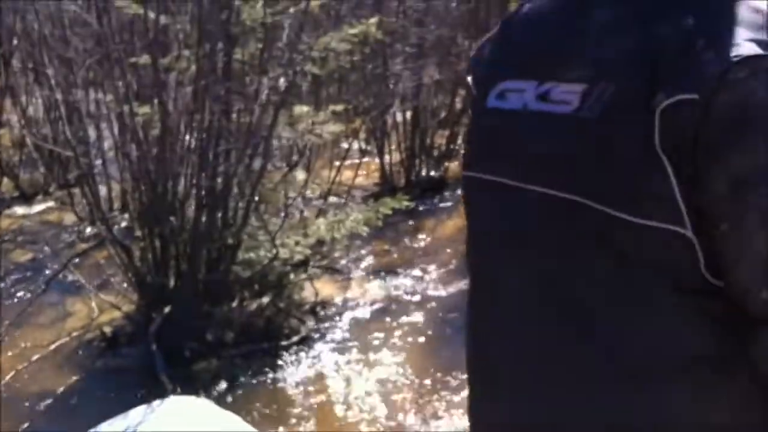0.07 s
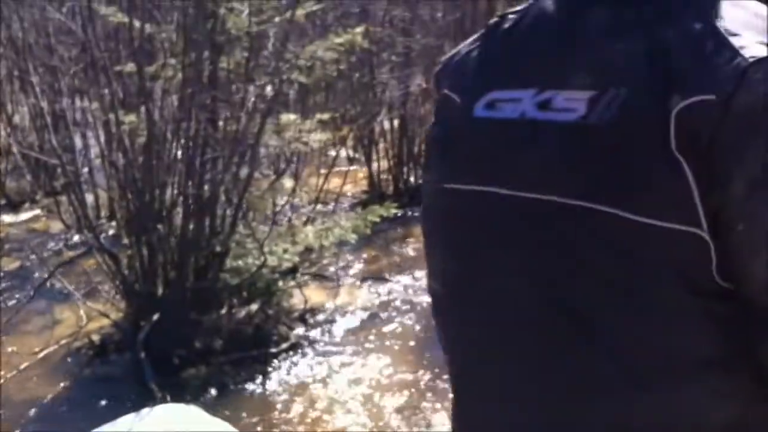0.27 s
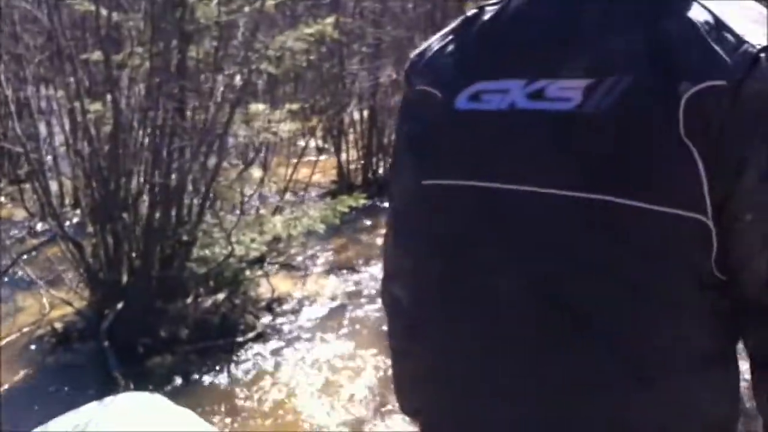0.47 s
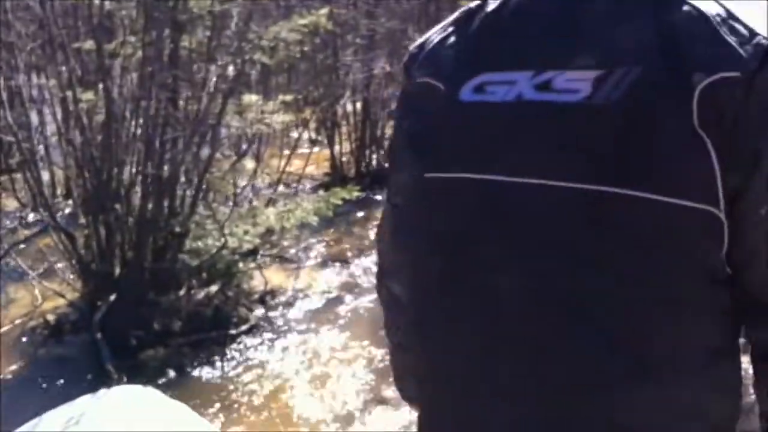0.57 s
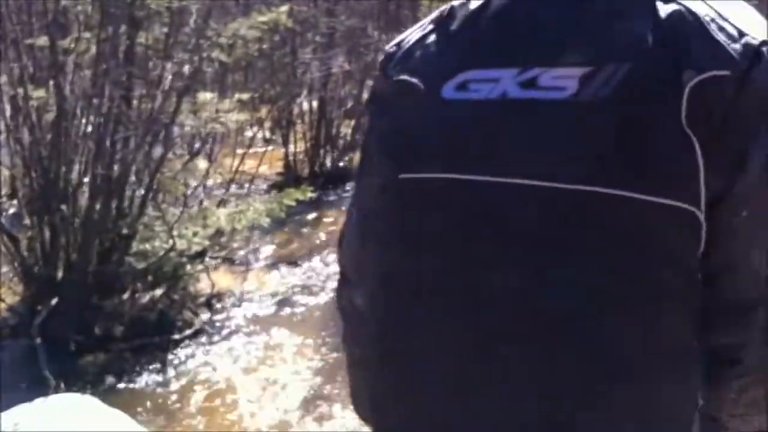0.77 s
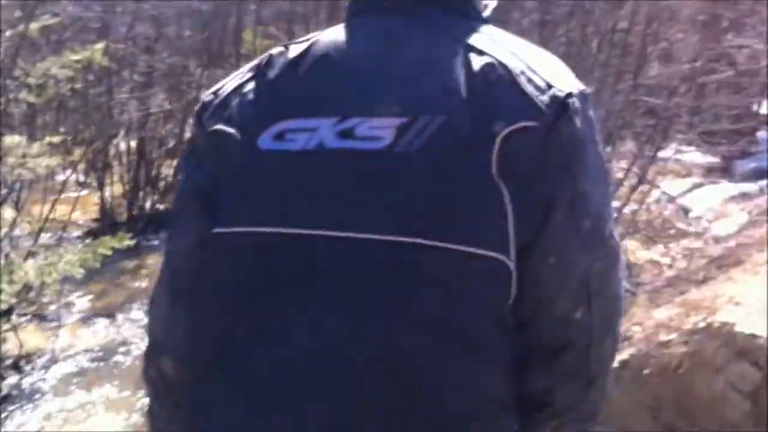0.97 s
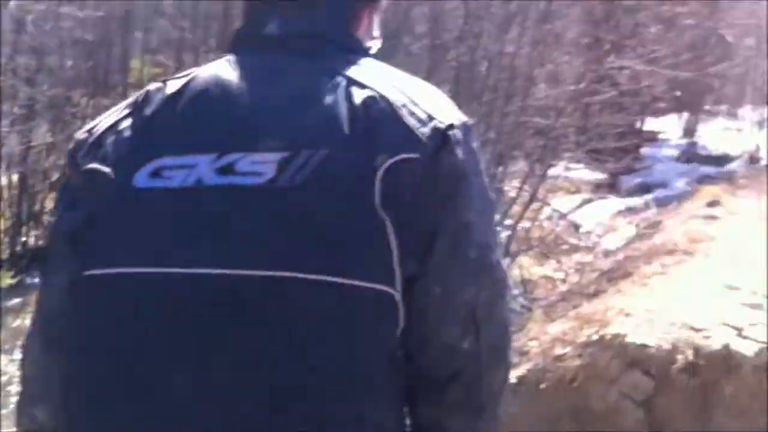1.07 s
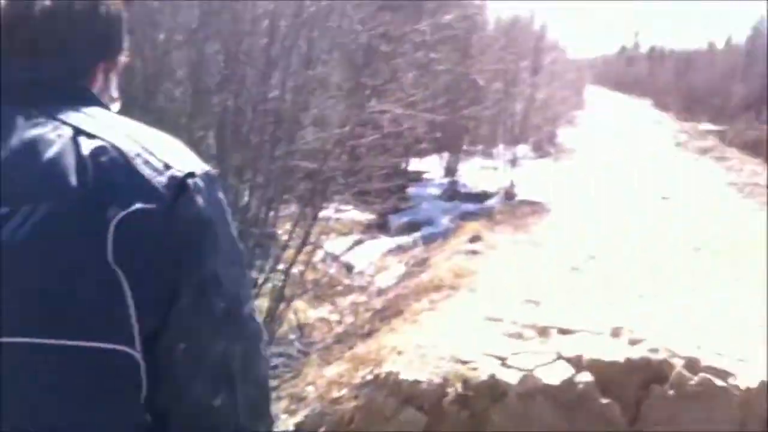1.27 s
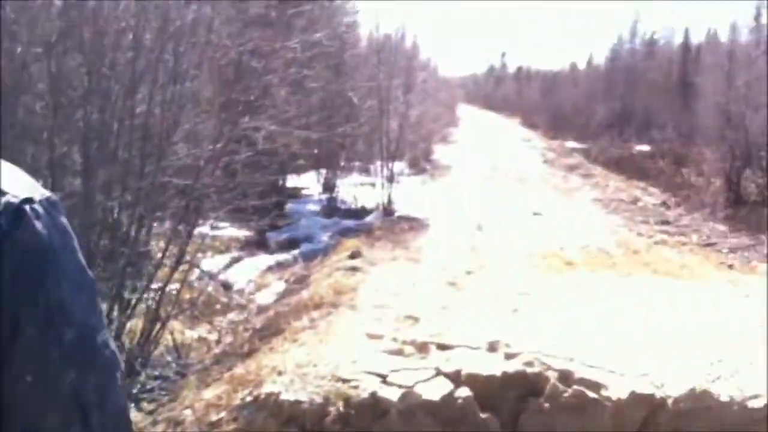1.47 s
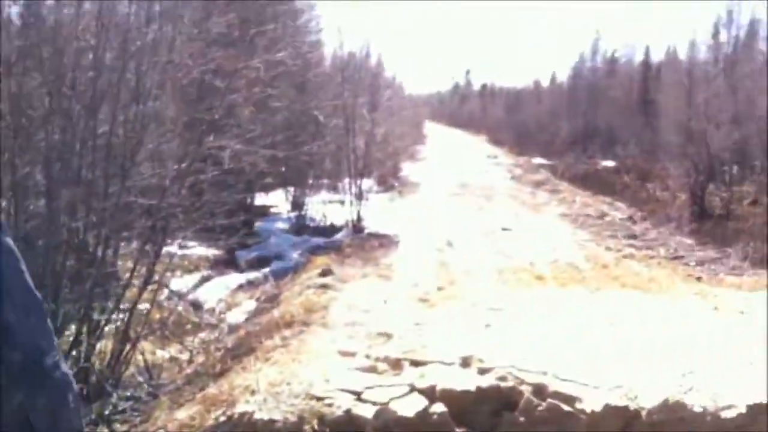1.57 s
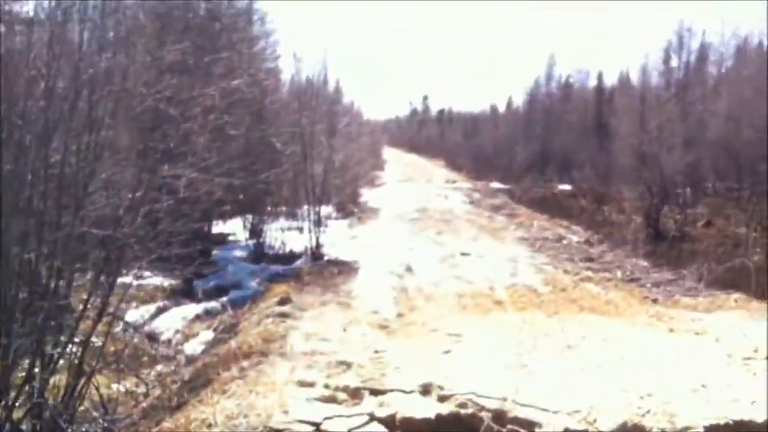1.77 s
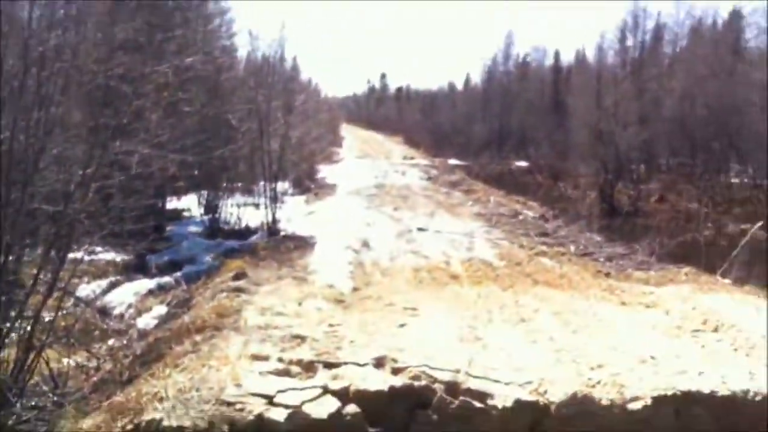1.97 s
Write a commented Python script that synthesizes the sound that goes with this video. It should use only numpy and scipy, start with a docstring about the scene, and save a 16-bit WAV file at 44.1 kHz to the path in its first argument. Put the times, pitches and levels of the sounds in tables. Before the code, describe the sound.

Meltwater runs softly and steadily through a culvert in the open, with tiny bubbles, hollow glugs, plops and small wave slaps mostly in the first second. Small dry clicks start near 0.8 s, with a loud one at 0.97. The water grows fainter and duller; more case clicks and low hand bumps come at 1.2 to 1.55 s, then a click at 1.9 and a brushing sleeve.

```python
"""Meltwater runs through and around a culvert on a bush road: a soft rush of patchy noise with swarms of small bubbles.
Hollow glugs, blips and plops are damped tones; slaps of small waves are noise bursts.
The hand-held camera turns away from the water, which dulls and lowers it. Its case clicks (struck resonances)
and bumps in the hand (low tones), and a sleeve brushes it at the end (hiss and rubs).
Loud peaks make the gain control duck for a moment."""
import sys
import numpy as np
from scipy import signal
from scipy.fft import rfft, irfft, next_fast_len
from scipy.io import wavfile
from scipy.ndimage import uniform_filter1d, map_coordinates

SR = 44100
rng = np.random.default_rng(int(sys.argv[2]) if len(sys.argv) > 2 else 0)


def unload_wav(signal):
    """Save mono or channel-first audio to the path in sys.argv[1] as 16-bit WAV at rate SR, clipped to [-1, 1]."""
    wavfile.write(
        sys.argv[1],
        SR,
        np.round(np.clip(np.atleast_2d(signal).T, -1, 1) * 32767).astype(np.int16),
    )


N = 89170


def amp(db):
    """Decibels to gain."""
    return 10 ** (np.asarray(db) / 20)


def unit(x):
    """Scale to rms 1."""
    return x / np.sqrt(np.mean(x ** 2) + 1e-20)


def decay(t, t60):
    """Exponential decay that falls 60 dB in t60."""
    return np.exp(-np.log(1000) * t / t60)


def curve(rows):
    """One value per sample from (start_s, value) rows."""
    return np.interp(np.arange(N) / SR, *np.transpose(rows))


def wobble(knots_per_s):
    """A smooth random curve through normal-distributed knots."""
    knots = rng.standard_normal(int(N * knots_per_s / SR) + 4)
    return map_coordinates(knots, [np.arange(N) * knots_per_s / SR])


def filtered(x, response):
    """Apply a gain given as a function of frequency in Hz."""
    size = next_fast_len(N + 8192)
    return irfft(rfft(x, size) * response(np.fft.rfftfreq(size, 1 / SR)), size)[:N]


def noise(spectrum, patchy_db):
    """Coloured noise of rms 1 with time-frequency patches of random gain."""
    grid = signal.stft(rng.standard_normal(N), nperseg=512)[2]
    patches = uniform_filter1d(rng.standard_normal(grid.shape), 5, 0)  # across frequency
    patches = uniform_filter1d(patches, 6, 1)  # across time
    x = signal.istft(grid * amp(patchy_db * unit(patches)), nperseg=512)[1][:N]
    hz, db = np.transpose(spectrum)
    return unit(filtered(x, lambda f: amp(np.interp(np.log(f + 1), np.log(hz), db))))


def add(track, start_s, sound):
    """Mix a sound into a track."""
    part = track[max(0, round(start_s * SR)):][:len(sound)]
    part += sound[:len(part)]


def damped_tones(rows, attack_s, cycles, rise_per_s):
    """Soft-start tones that fall 60 dB in a count of cycles; pitch climbs by the share rise_per_s each second."""
    out, t = np.zeros(N), np.arange(SR // 5) / SR
    for start_s, pitch_hz, level_db in rows:
        tone = np.sin(2 * np.pi * pitch_hz * t * (1 + rise_per_s * t / 2))
        envelope = (1 - np.exp(-t / attack_s)) * decay(t, cycles / pitch_hz)
        add(out, start_s, amp(level_db) * tone * envelope)
    return out


def minimum_phase(gain):
    """Causal impulse response with this gain on the FFT grid, by folding the cepstrum."""
    cepstrum = irfft(np.log(np.maximum(gain, 1e-6)))
    half = len(cepstrum) // 2
    fold = np.r_[1, np.full(half - 1, 2), 1, np.zeros(half - 1)]
    return irfft(np.exp(rfft(cepstrum * fold)))


def bumps():
    """Soft bumps of the hand: low, heavily damped tones of fixed pitch."""
    # start_s, pitch_hz, level_db
    hand_bumps = [(.482, 92, -62), (.972, 89.5, -55.5), (1.324, 91, -50), (1.343, 181, -33.5),
                  (1.454, 144, -44), (1.470, 112, -52)]
    return damped_tones(hand_bumps, attack_s=0.0045, cycles=5.7, rise_per_s=0)


def sleeve():
    """Cloth slides over the case with an uneven hiss and a few low rubs that rise in pitch."""
    # hiss level: start_s, level_db
    brush_level = [(1.88, -97), (1.915, -65), (1.955, -54), (1.995, -48.5), (2.02, -47.5)]
    # hiss colour: freq_hz, density_db (per Hz)
    cloth_colour = [(100, -49), (1000, -9.5), (1800, -9), (2400, -9), (4200, -9), (4850, 6), (5350, 4.5),
                    (6200, -7), (8200, -4.5), (10000, -9.5), (12500, -7), (16000, -24)]
    # low rubs: start_s, pitch_hz, level_db
    rubs = [(1.946, 165, -42.5), (1.972, 273, -40)]
    hiss_db = curve(brush_level) + 1.6 * wobble(110)
    hiss = amp(hiss_db) * noise(cloth_colour, patchy_db=3.0)
    return hiss + damped_tones(rubs, attack_s=0.02, cycles=29, rise_per_s=10.8)


def clicks():
    """Each click strikes the case resonances in its own balance and tuning, with rebound, crack and rattle."""
    # resonances of the camera case: freq_hz, half_width_hz, level_db
    case_modes = [(1360, 148, -4), (1676, 127, -4), (3708, 320, 1), (4670, 270, -5), (5310, 410, 0),
                  (6060, 300, 1), (6730, 240, -1.5), (8250, 480, -1.5), (9430, 550, -1), (11170, 560, 2),
                  (12260, 530, -6), (13730, 460, -2), (16450, 590, 2)]
    # centres of the strike bands: freq_hz
    band_hz = [550, 1290, 1620, 2150, 3650, 5150, 6300, 9000, 11500, 14500]
    # clicks: start_s, tuning_ratio, rebound_db, level_db, rattle_db, then strike_db for each band
    strikes = [(.8020, 0.83, -30, -25.5, -6, -6, -6, -8, -7, 1, -4, 1, 2, -15, -13),
               (.8153, 1.15, -30, -15.5, -5, -14, -14, -16, -18, -13, -12, -7, -1.5, -2, -18),
               (.8276, 1.07, -30, -14.5, -16, -16, -21, -14, -10, -24, -30, -5, -1, 1.5, -25),
               (0.8379, 1.1, -30, -15.5, -15, -2, -5, -13, -8, -6, -14, -2, 0, 0, -2),
               (.9452, 1.23, -30, -16.5, -12, -20, -15, -13, -1, -1, -12, -3, -7, -28, -31),
               (0.9538, 1.4, -30, -9, -26, -19, -15, -12, -17, -38, -43, -8, -5.5, 5, 7),
               (0.9657, 1.36, -30, -10, -22, -12, -10, -16, -30, -45, -24, 10, -18, -19, -13),
               (0.9725, 0.96, -46, 13.5, -10.5, 4, -10, -1, -3.5, -5.5, -18, -1, -19.5, -7.5, -3),
               (1.2120, 0.96, -30, -17, -3, -28, -28, -21, -26, -35, -35, -37, -10.5, 2.5, -2),
               (1.2308, 1.015, -36, 3.5, -41, -10, -9, -6.5, -4.5, 3.5, -21, -9.5, -0.5, -2, -16),
               (1.3362, .99, -34, -3, -26, -5, -3, 3, -5, -18, -9, -21, -13, -14, -18),
               (1.345, 0.97, -30, -17, -18, -19, -24, -15, -14.5, -25, -24, -10, -13, 3, -1),
               (1.4505, 0.95, -42, 9, -19, 6, -0.5, 0.5, -5, -20, -13.5, -24.5, -24, -35, -31),
               (1.5305, 0.966, -31, -9, -13.5, -14, -18, -9, -25, -13, -2, -10, -4.5, -13, -5),
               (1.8994, 0.95, -2.5, -2.5, -26, 8, -13, -11, 4, -21, -1.5, 1.5, -8, 1.5, -8),
               (1.9192, 1.4, -30, -20, -8, -23.5, -20, -20, -22, -20, -17, -15, -13, 5, -12),
               (1.934, 1.02, -29.5, -18, 1, -15, -6, 2.5, 15, -10, -16, -14, -14, -14, -14)]
    crack_db, crack_t60_s, rattle_t60_s = -6.5, 0.013, 0.078
    low_cut_hz, rebound_s = 1096, 0.0007
    out, t = np.zeros(N), np.arange(4096) / SR
    f = np.fft.rfftfreq(len(t), 1 / SR)
    low_cut = 1 / (1 + (low_cut_hz / (f + low_cut_hz / 20)) ** 6)
    for start_s, tuning, rebound_db, level_db, rattle_db, *strike_db in strikes:
        body = sum(amp(db) / (1 + ((f - tuning * hz) / width_hz) ** 2) for hz, width_hz, db in case_modes)
        ring = minimum_phase(body * low_cut * amp(np.interp(f, band_hz, strike_db)))
        rebound = np.pad(ring, (round(rebound_s * SR), 0))[:len(t)]
        ring = ring - amp(rebound_db) * rebound
        crack = rng.standard_normal(len(t)) * decay(t, crack_t60_s)
        rattle = rng.standard_normal(len(t)) * decay(t, rattle_t60_s)
        scatter = amp(crack_db) * crack / np.linalg.norm(crack)
        scatter = scatter + amp(rattle_db) * rattle / np.linalg.norm(rattle)
        scattered = signal.fftconvolve(ring, scatter)[:len(t)]
        add(out, start_s, amp(level_db) * (ring + scattered))
    return out


def slaps():
    """Small waves break in short bursts of coloured noise."""
    # bursts, before a gain of 2: start_s, level_db, t60_s
    bursts = [(0.086, -57, 0.045), (0.133, -55, 0.038), (.425, -48.5, 0.033), (0.555, -57, 0.045),
              (0.665, -50, 0.064), (0.773, -54, 0.011)]
    # freq_hz, density_db (per Hz)
    slap_colour = [(40, -52), (100, -42), (300, 0), (800, -3), (1500, -26), (2600, -9), (6000, -9),
                   (15000, -13)]
    rise_share = 0.069  # rise time constant as a share of t60
    level, t = np.zeros(N), np.arange(SR // 5) / SR
    for start_s, level_db, t60_s in bursts:
        rise = 1 - np.exp(-t / (rise_share * t60_s))
        add(level, start_s, 2 * amp(level_db) * rise * decay(t, t60_s))
    return level * noise(slap_colour, patchy_db=4)


def plops():
    """Drops plop into the pool: quickly damped tones."""
    # start_s, pitch_hz, level_db
    drops = [(.427, 317, -37.5), (.557, 640, -36), (.7725, 403, -35), (.7885, 370, -37.5),
             (.8045, 310, -38.5), (.860, 564, -34)]
    return damped_tones(drops, attack_s=0.0014, cycles=5.6, rise_per_s=1.8)


def blips():
    """Small bubbles burst near the bank: high tones that rise as they ring."""
    # start_s, pitch_hz, level_db
    bursting_bubbles = [(.086, 1720, -48.5), (.089, 2400, -42), (.123, 1800, -55), (.137, 2170, -39),
                        (.181, 3630, -43.5), (.376, 1660, -45.5), (.388, 1635, -45), (.407, 2350, -44),
                        (.424, 1460, -49.5), (.427, 2050, -45.5), (.450, 1430, -45), (.654, 2170, -46.5),
                        (.668, 3760, -39.5), (.751, 1960, -46.5), (.7725, 1446, -43), (.788, 1620, -47.5),
                        (.870, 2080, -49), (.898, 1310, -56), (.946, 1850, -41), (.955, 1700, -40)]
    return damped_tones(bursting_bubbles, attack_s=0.001, cycles=42.4, rise_per_s=6.3)


def glugs():
    """Glugs and large bubbles at the pipe: hollow tones that rise slightly."""
    # start_s, pitch_hz, level_db
    pipe_glugs = [(.272, 787, -43.5), (.341, 378, -40.5), (.352, 328, -41.5), (.424, 382, -44.5),
                  (.428, 259, -48), (.498, 805, -47.5), (.552, 700, -40), (.556, 867, -41.5),
                  (.562, 1120, -40), (.634, 1180, -51), (.660, 890, -41), (.672, 780, -49),
                  (.948, 850, -46), (.999, 313, -41), (1.142, 276, -47.5)]
    return damped_tones(pipe_glugs, attack_s=0.0015, cycles=27, rise_per_s=1.8)


def bubbles(per_s, centre_hz, spread, cycles, size_db):
    """A swarm of damped, slightly rising tones, scaled to rms 1."""
    count = int(per_s * N / SR)
    when, pitch, size = rng.random((count, 3)).T
    log_ratio = spread * np.log(pitch / (1 - pitch)) / 2  # logistic scatter of pitch
    hz = np.clip(centre_hz * np.exp(log_ratio), 220, 15000)[:, None]
    age = np.arange(SR // 25) / SR * hz / cycles  # 1 when 60 dB down
    tone = np.sin(2 * np.pi * cycles * age * (1 + 0.093 * np.minimum(age, 1)))
    tone = tone * decay(age, 1) * (1 - np.exp(-2 * cycles * age))
    tone = tone * amp(-size_db * np.log(1 - .98 * size))[:, None]  # few large, many small
    at = (when * N).astype(int)[:, None] + np.arange(tone.shape[1])
    return unit(np.bincount(at.ravel(), tone.ravel(), N)[:N])


def stream():
    """Rush, bubbles and spray share one level; treble loses more as the camera turns away."""
    # stream level: start_s, level_db
    flow_level = [(0, -54.5), (.45, -55.5), (.85, -55), (1.05, -57.5), (1.4, -58), (1.7, -58.5),
                  (2.02, -56)]
    # rush of the water: freq_hz, density_db (per Hz)
    rush_colour = [(25, -43), (70, -21.5), (140, -11), (215, -4.5), (280, 0), (380, 1), (520, -6), (850, 0),
                   (1250, -5.5), (1750, -4), (2600, -9), (5000, -12), (9000, -15), (15500, -16.5)]
    bubble_db, spray_db = -8.5, -10.5  # relative to the rush
    treble_loss_db_per_db = 0.5  # extra loss per dB below the highest level
    flow_db = curve(flow_level)
    water = noise(rush_colour, patchy_db=2.25) * amp(0.86 * wobble(21.44))
    water = water + amp(bubble_db) * bubbles(260, centre_hz=1209, spread=0.471, cycles=30.6, size_db=2.0)
    water = water + amp(spray_db) * bubbles(900, centre_hz=4720, spread=0.68, cycles=2.5, size_db=9.5)
    treble = filtered(water, lambda hz: hz ** 2 / (hz ** 2 + 2200 ** 2))
    treble_gain = amp(treble_loss_db_per_db * (flow_db - flow_db.max()))
    return amp(flow_db) * (water - treble + treble * treble_gain)


def scene():
    """Water and pipe, with the handling of the camera close by."""
    water = stream() + glugs() + blips() + plops() + slaps()
    handling = clicks() + bumps() + sleeve()
    return (water + handling)[None]


def record(dry):
    """Gain control ducks just after a loud peak and recovers steadily; a steep low-pass limits the band."""
    limit_db, duck_db_per_db, attack_s, recover_db_per_s = -14, 0.35, 0.024, 64
    top_hz = 16000
    x = dry[0]
    recovery_db = recover_db_per_s * np.arange(N) / SR
    over_db = np.maximum(20 * np.log10(np.abs(x) + 1e-9) - limit_db, 0)
    held_db = np.maximum.accumulate(over_db + recovery_db) - recovery_db  # peak hold, linear fall
    pole = np.exp(-1 / (attack_s * SR))
    duck_db = duck_db_per_db * signal.lfilter([1 - pole], [1, -pole], held_db)
    return filtered(x * amp(-duck_db), lambda hz: 1 / np.sqrt(1 + (hz / top_hz) ** 240))[None]


dry = scene()
out = record(dry)
unload_wav(out)
```